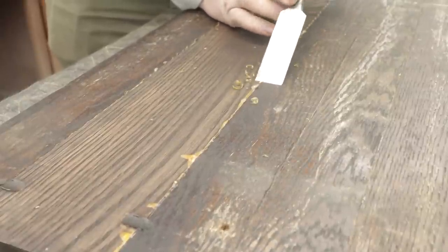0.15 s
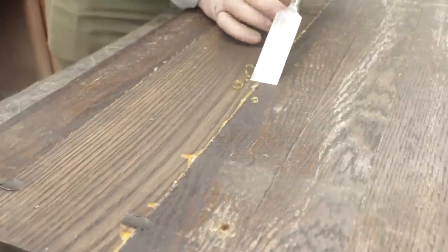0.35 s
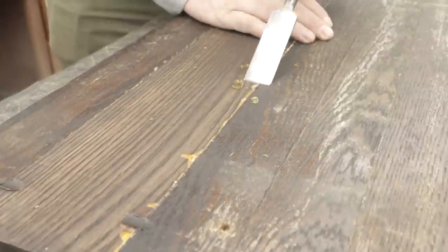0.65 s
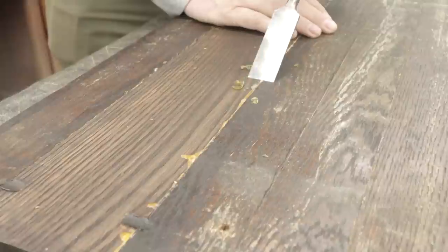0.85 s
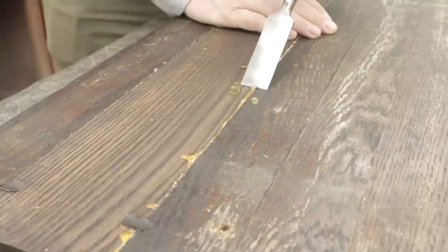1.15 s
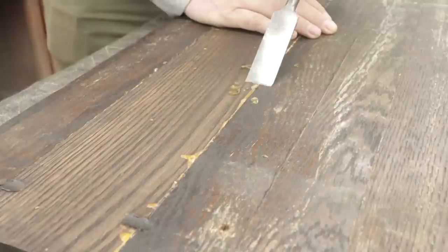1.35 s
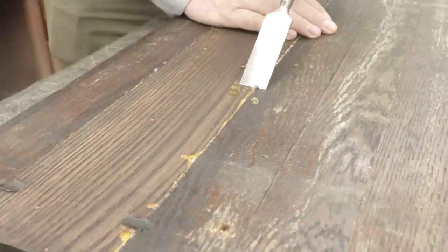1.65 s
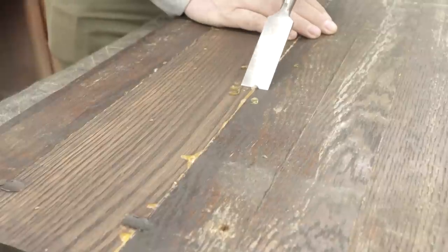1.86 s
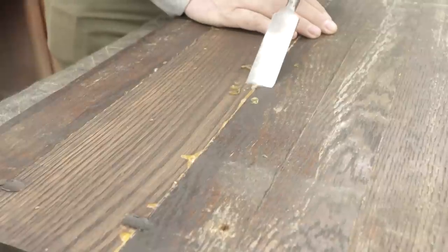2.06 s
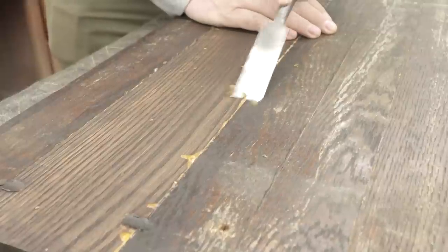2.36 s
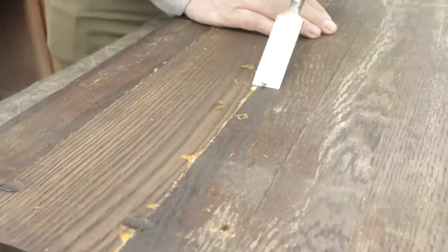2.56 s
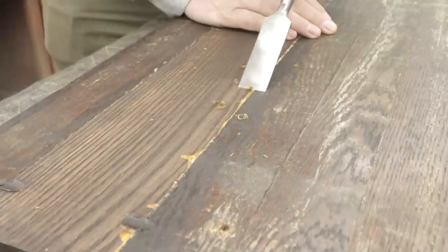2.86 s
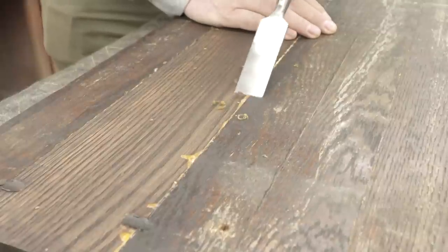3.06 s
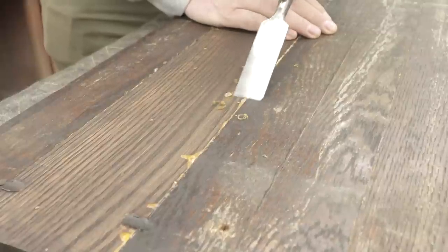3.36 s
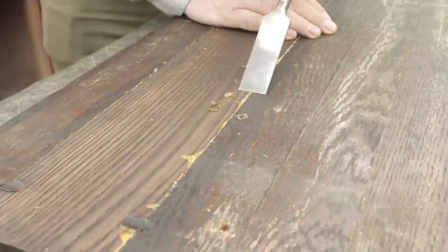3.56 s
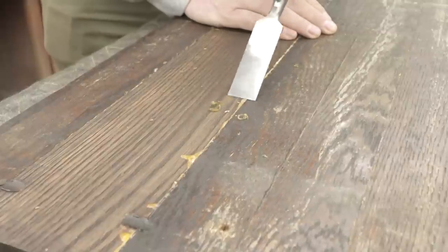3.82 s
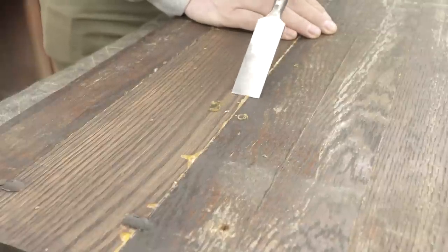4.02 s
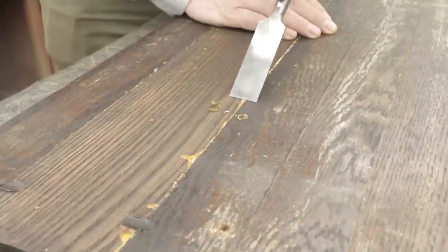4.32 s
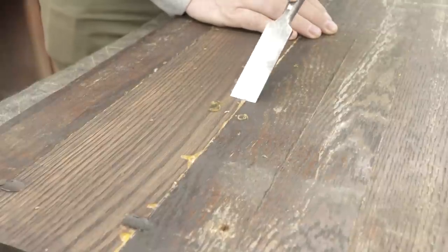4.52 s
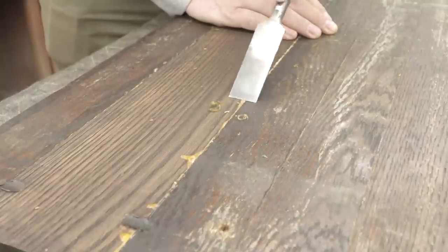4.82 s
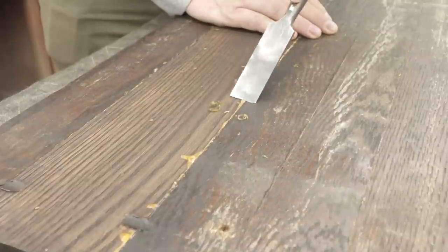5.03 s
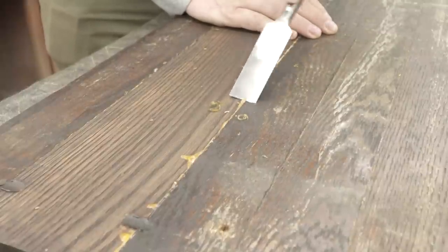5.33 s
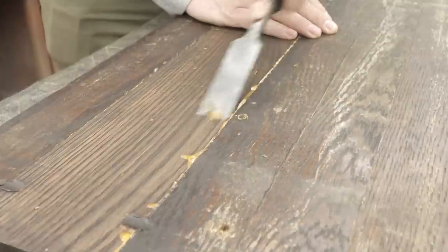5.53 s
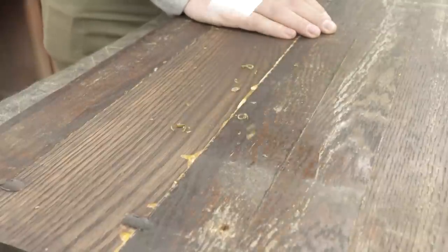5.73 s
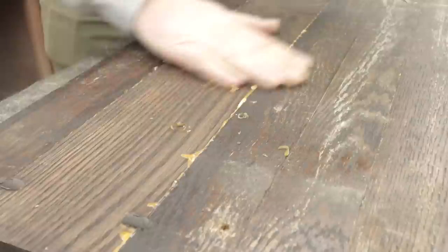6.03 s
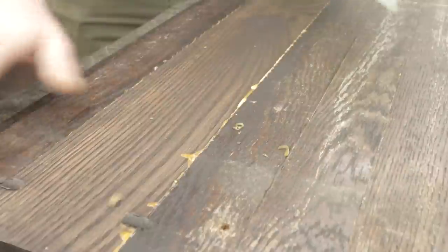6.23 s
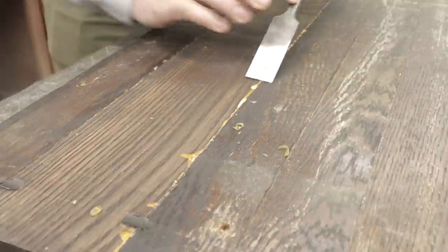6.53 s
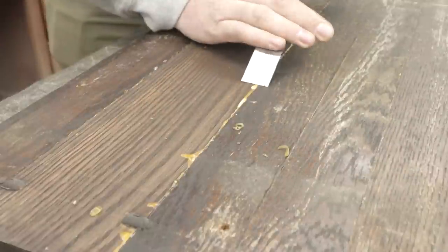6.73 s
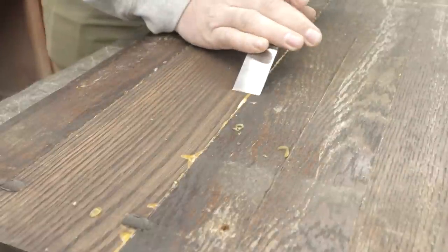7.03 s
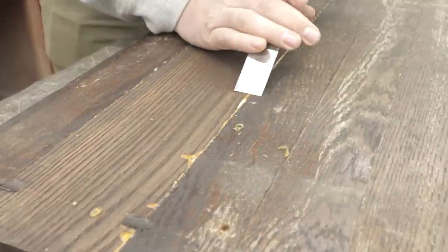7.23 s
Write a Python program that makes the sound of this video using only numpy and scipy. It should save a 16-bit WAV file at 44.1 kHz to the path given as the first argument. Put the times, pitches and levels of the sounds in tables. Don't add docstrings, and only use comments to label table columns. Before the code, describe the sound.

Quick woody scrape-knocks with faint steel ring and brittle glue crackle, thinning to slower picks, a hard skidding stroke, and a soft hand brush in a quiet workshop.

```python
import sys
import numpy as np
from scipy import signal
from scipy.fft import rfft, irfft, next_fast_len
from scipy.io import wavfile
from scipy.ndimage import uniform_filter1d, map_coordinates

SR = 44100
rng = np.random.default_rng(int(sys.argv[2]) if len(sys.argv) > 2 else 0)


def convert_level_to_amplitude(level_db):
    exponent = np.asarray(level_db, float) / 20
    return 10 ** exponent


def store_pcm(level_fs):
    pcm = np.round(np.clip(level_fs, -1, 1) * 32767).astype(np.int16)
    wavfile.write(sys.argv[1], SR, np.atleast_2d(pcm).T)


N = 325458


def unit(x):
    return x / np.sqrt(np.mean(x ** 2) + 1e-20)


def along(points, hz):
    f, v = np.transpose(points)
    return np.interp(np.log(hz + 1), np.log(f + 1), v)


def gain(rows):
    s, db = np.transpose(rows)
    return convert_level_to_amplitude(np.interp(np.arange(N) / SR, s, db, -150, -150))


def coloured(x, spectrum):
    length = x.shape[-1]
    m = next_fast_len(length + 8192)
    response = convert_level_to_amplitude(along(spectrum, np.fft.rfftfreq(m, 1 / SR)))
    return unit(irfft(rfft(x, m) * response, m)[..., :length])


def rings(modes, rise, sense):
    hz, db, t60 = np.transpose(modes)[:, :, None]
    t = np.arange(SR // 8) / SR
    sign = sense ** np.arange(len(modes))[:, None]
    return sign * convert_level_to_amplitude(db - 60 * t / t60) * np.sin(2 * np.pi * hz * t) * (1 - np.exp(-t / rise))


def tilted(modes, db_per_octave):
    return [(hz, db + db_per_octave * np.log2(hz / modes[0][0]), t60) for hz, db, t60 in modes]


def rubbed(force, modes):
    ring = rings(modes, rise=0.000044, sense=-0.78).sum(0)
    return signal.fftconvolve(force, ring / np.linalg.norm(ring))[:N]


def grit(size, rate, spread_db):
    happens = rng.random(size) < rate / SR
    return happens * np.sign(rng.standard_normal(size)) * convert_level_to_amplitude(spread_db * rng.standard_normal(size))


def slips(rate):
    return unit(grit(N, rate, spread_db=1.0))


# frequency in Hz, level in dB per Hz.
SHOP = [(15, -61), (121, -22), (185, -2), (300, -9), (1090, -17.5), (3980, -28), (7000, -51.5),
        (15400, -120)]


def shop():
    z = signal.stft(rng.standard_normal(N + 512), nperseg=512)[2]
    patches = uniform_filter1d(uniform_filter1d(rng.standard_normal(z.shape), 6, 0), 14, 1)
    tone = signal.istft(z * convert_level_to_amplitude(unit(patches)), nperseg=512)[1][:N]
    return convert_level_to_amplitude(-59.5) * coloured(tone, SHOP)


# frequency in Hz, level in dB per Hz.
CRACKLE = [(1500, -120), (2500, -1), (4000, -3.5), (5200, -14.5), (8000, -20), (15500, -33.5)]


def glue(force):
    return convert_level_to_amplitude(11) * force * coloured(grit(N, rate=8000, spread_db=4), CRACKLE)


# catch in seconds, knock in dB, knock bite in dB, cut in dB, cut bite in dB.
JABS = [(0.04, -24, -3.5, -39, 0.5), (0.254, -21, -5, -32.5, -13), (0.498, -21, -9, -42, -17),
        (0.744, -21.5, -3, -31.5, -20), (0.973, -19, -7, -34, -17.5), (1.203, -18, -5, -38.5, -4),
        (1.443, -18, -8.5, -33, -9), (1.669, -15, -9.5, -36, -11.5), (1.906, -15.5, -10.5, -32, -12),
        (2.141, -14.5, -15, -36.5, -8.5), (2.382, -18.5, -5, -29, -12)]
# catch in seconds, knock in dB, knock bite in dB, cut in dB, cut bite in dB.
RETURNS = [(0.154, -35.5, -9, -45.5, -3), (0.639, -34, -16, -47.5, -1.5), (0.874, -33, -9, -51.5, -12),
           (1.106, -29, -10.5, -58.5, -8.5), (1.331, -34.5, -3, -46.5, -4), (1.582, -43.5, 1.5, -51, -8.5),
           (1.809, -31, -8, -41.5, -14.5), (2.055, -39.5, -3, -44.5, -16.5), (2.292, -30, -9, -51.5, 0.5)]
# start in seconds, length in seconds, level in dB, bite in dB, blade over panel in dB.
CUTS = [(0.36, 0.049, -57.5, -2.5, -6), (2.385, 0.021, -46.5, 11, 0), (2.411, 0.033, -34, -11, -17),
        (2.522, 0.034, -32, -7.5, -6), (2.61, .014, -66, 11, -6), (2.701, 0.0526, -33, -12.5, -7.5),
        (2.868, 0.019, -42.5, -11.5, -8), (2.925, 0.042, -38.5, -23, -15), (2.966, 0.034, -36.5, -11, -10),
        (3.065, 0.05, -49, -9, -7), (3.202, 0.024, -55, -4.5, -2), (3.423, 0.045, -43.5, -7.5, -8),
        (3.46, 0.043, -50.5, 1, -20), (3.547, 0.033, -35, -12.5, -4), (3.668, 0.042, -39.5, -5, -11),
        (3.756, 0.076, -48, -6.5, -3), (4.03, .04, -60.5, -14, 13.5), (5.471, 0.019, -51.5, -8, -3),
        (6.843, .048, -40, -13.5, -4.5), (6.982, 0.036, -53, -31, -3), (7.085, 0.061, -45, -27, -1),
        (7.214, .02, -49, -14, 0), (7.332, .06, -53, 5, -1)]


def strokes():
    blade_db = -8
    cuts = [(s - 0.043, 0.046, db, bite_db, blade_db) for s, *_, db, bite_db in JABS]
    cuts += [(s - 0.029, 0.048, db, bite_db, blade_db) for s, *_, db, bite_db in RETURNS]
    out = []
    for s, length, db, bite_db, blade_db in cuts + CUTS:
        panel_db = db + bite_db
        crackle_db = -73.5 + 0.41 * (panel_db + 42.5)
        out.append((max(s, 0), length, db, panel_db, panel_db + blade_db, crackle_db))
    return out


def pushes():
    force, t = np.zeros((4, N)), np.arange(N) / SR
    for s, length, *levels_db in strokes():
        end = s + length
        now = slice(round(s * SR), round((end + 0.0065) * SR))
        swell = np.clip((t[now] - s) / (0.51 * length), 0, 1)
        release = np.clip((end + 0.0022 - t[now]) / 0.0074, 0, 1)
        force[:, now] += convert_level_to_amplitude(np.array(levels_db))[:, None] * swell * release
    return force


# time in seconds, level in dB.
DRAG = [
    [(0.0, -33.5), (0.13, -64), (0.9, -53), (1.35, -46), (1.84, -55), (2.55, -54.5), (2.9, -47),
     (3.26, -57.5), (3.68, -45.5), (3.85, -62.5), (4.1, -72), (4.13, -47.5), (4.3, -78)],
    [(6.58, -55), (6.76, -81), (6.92, -59), (7.04, -65), (7.14, -53.5), (7.25, -69), (7.38, -37.5)],
]
# time in seconds, leaf over board in dB.
SPOT = [(0, -0.5), (.8, -4.5), (1.6, 2.5), (2.3, -1.5), (2.7, 6), (3.2, -1), (3.7, 4), (4.3, -6.5),
        (6.6, -1), (6.9, -1.5), (7.15, 10.5), (7.38, -19)]
# frequency in Hz, level in dB, time to fall 60 dB in seconds.
LEAF = [(176, -16.5, 0.032), (220.3, -7, 0.046), (261.8, 4, 0.044), (296.2, 1, 0.058)]
# frequency in Hz, level in dB, time to fall 60 dB in seconds.
BOARD = [(356.5, -8, 0.12), (423.4, 1, 0.044), (466, -0.5, 0.061), (634.5, -9.5, 0.048)]
# frequency in Hz, level in dB, time to fall 60 dB in seconds.
PANEL = [(750, -18.5, 0.085), (891, -1, 0.037), (974, -10, 0.072), (1058, -1, 0.027), (1164.6, 5, 0.033),
         (1302, -18.5, 0.094), (1493, -4.5, 0.03)]
# frequency in Hz, level in dB, time to fall 60 dB in seconds.
BLADE = [(1682, -7.5, 0.054), (1887, -6.5, 0.068), (2066, 7.5, 0.02), (2518, -1, 0.027),
         (2915, -2.5, 0.025), (3470, 3.5, 0.016), (3840, -9.5, 0.041)]


def scraping():
    board_drag = sum(gain(rows) for rows in DRAG)
    upper_drag = convert_level_to_amplitude(-17.5) * board_drag
    board, panel, blade, crackle = pushes()
    pressure, lean = (board + board_drag) * slips(rate=1200), gain(SPOT)
    low = (rubbed(pressure * lean, LEAF) + rubbed(pressure, BOARD)) / np.sqrt(1 + lean ** 2)
    middle = rubbed((panel + upper_drag) * slips(rate=2500), PANEL)
    steel = rubbed((blade + convert_level_to_amplitude(-8) * upper_drag) * slips(rate=3300), BLADE)
    return low + middle + steel + glue(crackle)


# time in
# seconds, knock in dB, bite in dB.
CONTACTS = [(2.032, -36, -12.5), (2.27, -31.5, -13.5), (2.395, -23, -3.5), (2.429, -36.5, -7),
            (2.508, -25.5, -3.6), (2.7, -32.5, -18), (2.731, -31, 2.2), (2.953, -39, -11), (2.983, -34, -9.5),
            (3.1, -31, -18.5), (3.204, -32, -23), (3.319, -43, -11), (3.433, -28.5, -25), (3.44, -33.5, 1.5),
            (3.552, -40, -4.5), (3.573, -37, 0.5), (3.677, -30.5, -15), (3.686, -30, -16), (3.714, -31, -30),
            (3.804, -44, -11), (4.106, -36.5, -25), (4.118, -23, -4),
            (5.145, -47.5, -3.5), (5.48, -46, -17), (5.558, -27.5, -0.5), (6.564, -23.5, 0.5),
           (6.623, -46, -9), (6.884, -39.5, -10), (6.897, -35.5, -23), (7.129, -41.5, -20),
           (7.22, -42.5, -18), (7.328, -29.5, -31), (7.349, -31, -14)]


def knocks():
    entries = [(s - 0.023, db - 2.5, bite_db + 7) for s, *_, db, bite_db in JABS]
    groups = [(JABS, 0.5, 0), (RETURNS, -10, -3.5), (CONTACTS + entries, 1.6, 0)]
    out = []
    for rows, leaf_db, change_db in groups:
        for s, db, bite_db, *_ in rows:
            soft_db = -0.2068 * (db + 34)
            spot_db = 0.29 * np.interp(s, *np.transpose(SPOT))
            crackle_db = -61.5 + change_db + 0.72 * (db + bite_db + 25) - db
            out.append((s, db, leaf_db + soft_db + spot_db, bite_db, bite_db - 4, crackle_db))
    return out


def catches():
    out, t = np.zeros(N + SR), np.arange(SR // 20) / SR

    def held(modes):
        return [(hz, db, 0.77 * t60) for hz, db, t60 in modes]

    families = [rings(held(BOARD), rise=0.0029, sense=1), rings(held(LEAF), rise=0.011, sense=0.9),
                rings(PANEL, rise=0.0052, sense=-1.01),
                rings(tilted(BLADE, -5), rise=0.0015, sense=-0.84)]
    shares = (0.1, 0.1, 0.3, 0.4)
    burst = convert_level_to_amplitude(-60 * t / 0.03) * (1 - np.exp(-t / 0.001))
    for s, db, leaf_db, panel_db, blade_db, crackle_db in knocks():
        judder = grit(len(t), rate=1500, spread_db=2) * convert_level_to_amplitude(-60 * t / 0.02)
        start = round(s * SR)
        levels = (db, db + leaf_db, db + panel_db, db + blade_db)
        for modes, level, share in zip(families, levels, shares):
            force = share * judder - (t == 0)
            ring = signal.fftconvolve(force, convert_level_to_amplitude(rng.normal(0, 2.5, len(modes))) @ modes)
            out[start:][:len(ring)] += convert_level_to_amplitude(level) * ring / np.abs(ring).max()
        snapping = coloured(rng.standard_normal(len(t)), CRACKLE)
        out[start:][:len(t)] += convert_level_to_amplitude(db + crackle_db + 11.0) * snapping * burst
    return out[:N]


# time in seconds, level in dB.
SNAPS = [(0.04, -52), (2.384, -47), (2.395, -50.5), (2.508, -57), (2.731, -58.5), (5.56, -62),
         (6.564, -47.5)]
# frequency in Hz, level in dB per Hz.
SNAP = [(1500, -120), (2500, 8), (4000, -0.5), (6000, -14), (10000, -21), (15700, -27.5)]


def snaps():
    out, t = np.zeros(N + SR), np.arange(SR // 20) / SR
    burst = convert_level_to_amplitude(11.0 - 60 * t / 0.035) * (1 - np.exp(-t / 0.0011))
    for s, db in SNAPS:
        out[round(s * SR):][:len(t)] += convert_level_to_amplitude(db) * burst * coloured(rng.standard_normal(len(t)), SNAP)
    return out[:N]


SHOVE_S = 5.549
# level in dB, release in dB per second.
SHOVE_FAMILIES = [
    (-27.5, 235),
    (-27.5, 286),
    (-38.5, 406),
    (-62, 303),
]


def shove_force():
    t = np.arange(N) / SR - SHOVE_S
    bite_db = 898 * np.minimum(t, 0)
    after_hold = np.maximum(t - 0.0057, 0)
    return [convert_level_to_amplitude(db + bite_db - fall * after_hold) for db, fall in SHOVE_FAMILIES]


def shove():
    board, panel, blade, crackle = shove_force()
    skidding_panel = tilted([(620, 3, 0.031), (863, -2.5, 0.091)] + PANEL, 6.5)
    low = convert_level_to_amplitude(-5) * rubbed(board * slips(rate=1500), LEAF + BOARD)
    middle = convert_level_to_amplitude(-1.5) * rubbed(panel * slips(rate=2500), skidding_panel)
    steel = rubbed(blade * slips(rate=1800), tilted(BLADE, 9.5))
    return low + middle + steel + glue(crackle)


# frequency in Hz, level in dB per Hz.
CRUMBS = [(4000, -120), (5500, -0.5), (9000, -2.5), (13000, -3.5), (15700, -12.5)]


def crumble():
    t = np.arange(N) / SR - SHOVE_S
    gate = np.clip(t / 0.012, 0, 1) * np.clip((0.07 - t) / 0.04 + 1, 0, 1)
    return convert_level_to_amplitude(-74.5) * gate * coloured(grit(N, rate=3000, spread_db=3.5), CRUMBS)


# start in seconds, frequency in Hz, level in dB, time to fall 60 dB in seconds.
THUD = [
    (5.56, 65, -61.5, 0.78),
]


def trestle():
    t, out = np.arange(N) / SR, np.zeros(N)
    for s, hz, db, t60 in THUD:
        swell = np.clip((t - s) / 0.058, 0, 1)
        out += convert_level_to_amplitude(db - 60 * np.abs(t - s) / t60) * np.sin(2 * np.pi * hz * t) * swell
    return out


# time in seconds, level in dB.
SWEEP = [(5.87, -74), (5.95, -74.5), (6.05, -60.5), (6.185, -64.5), (6.23, -85), (6.26, -81)]
# frequency in Hz, level in dB per Hz.
PALM = [(500, -120), (900, -8), (1800, -5.5), (2800, -9.5), (4000, -10.5), (5500, -21), (7000, -120)]


def palm():
    grips = convert_level_to_amplitude(1.1 * map_coordinates(rng.standard_normal(N // 400 + 4), [np.arange(N) / 400]))
    squeak = rubbed(slips(rate=1300), [(2520, -0.14, 0.0069), (3000, -1.5, 0.012), (3480, -1.5, 0.013)])
    rub = coloured(grit(N, rate=6000, spread_db=5.0), PALM) + 0.57 * squeak
    crumbs = convert_level_to_amplitude(-8) * coloured(grit(N, rate=7700, spread_db=1.5), CRUMBS)
    return gain(SWEEP) * (grips * rub + crumbs)


# frequency in Hz, time to fall 60 dB in seconds.
WALLS = [(150, 0.8), (1000, 0.33), (4000, 0.39), (12000, 0.54)]


def walls(x):
    hz, t, z = signal.stft(rng.standard_normal(SR // 2), SR, nperseg=256)
    fading = z * convert_level_to_amplitude(-60 * t / along(WALLS, hz)[:, None])
    tail = signal.istft(fading, SR, nperseg=256)[1]
    return signal.fftconvolve(np.pad(x, (500, 0)), tail / np.linalg.norm(tail))[:N]


def scene():
    work = scraping() + catches() + snaps() + shove() + crumble() + palm()
    work = work + convert_level_to_amplitude(-14) * walls(work)
    thinned = signal.sosfilt(signal.butter(7, 135, "high", fs=SR, output="sos"), work)
    bench = signal.sosfilt(signal.butter(1, 60, fs=SR, output="sos"), work)
    air = shop() + thinned + convert_level_to_amplitude(-16) * bench + trestle()
    return np.array([np.pad(air, (1, 0))[:N], air])


def roll_off(x):
    return signal.sosfilt(signal.butter(12, 15820, fs=SR, output="sos"), x)


# frequency in Hz, level in dB per Hz.
HISS = [(20, -120), (35, -10), (70, -3), (110, -27.5), (200, -43), (2000, -44.5), (6000, -13.5),
        (15500, -15.5)]


def record(dry):
    hiss = convert_level_to_amplitude(-81.0) * coloured(rng.standard_normal(dry.shape), HISS)
    return roll_off(dry + hiss)


dry = scene()
out = record(dry)
store_pcm(out)
```